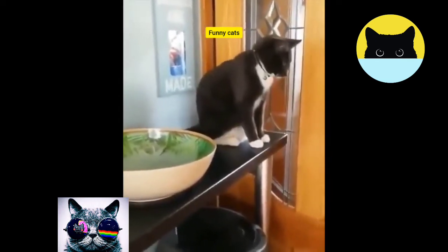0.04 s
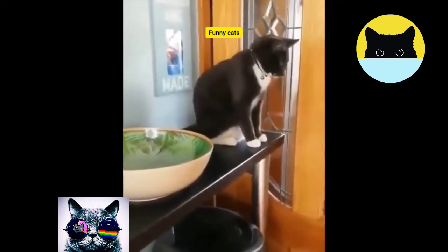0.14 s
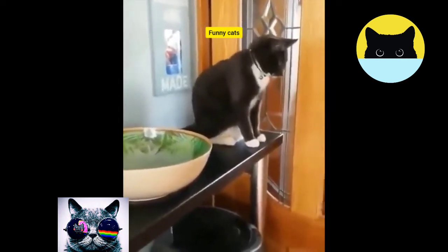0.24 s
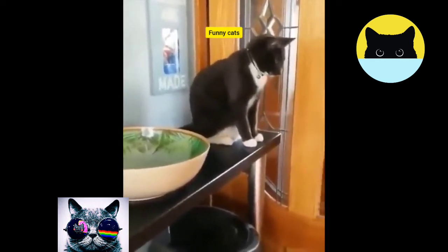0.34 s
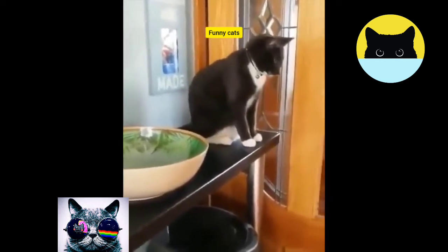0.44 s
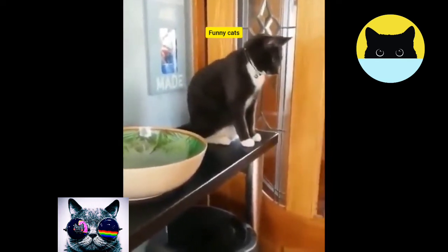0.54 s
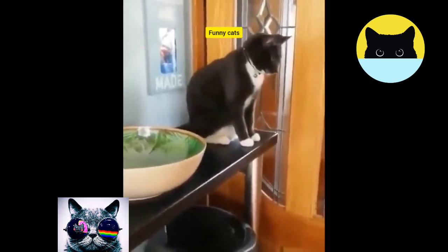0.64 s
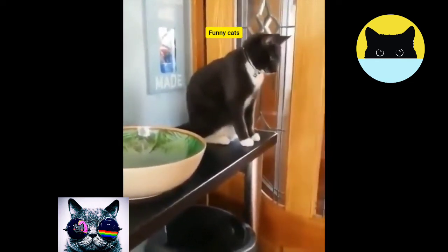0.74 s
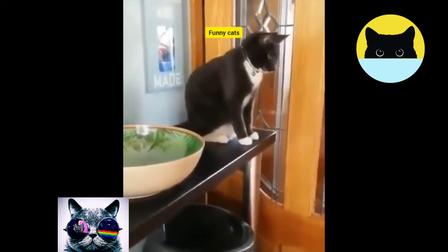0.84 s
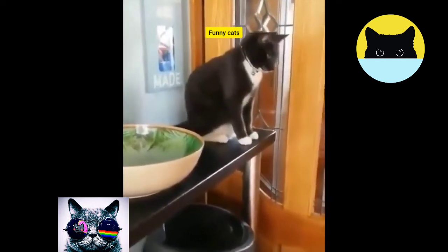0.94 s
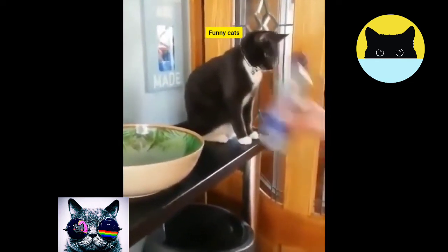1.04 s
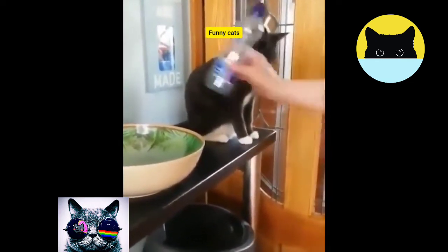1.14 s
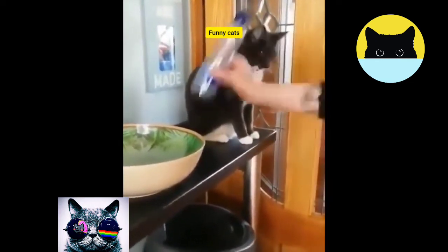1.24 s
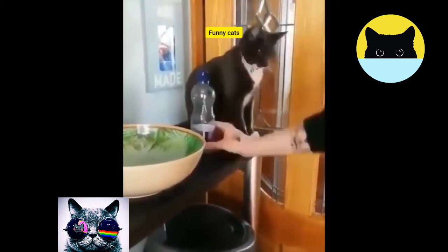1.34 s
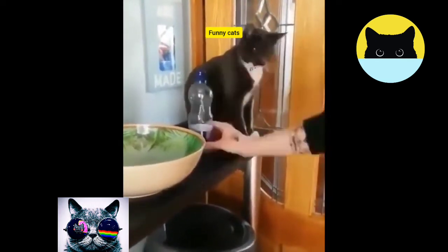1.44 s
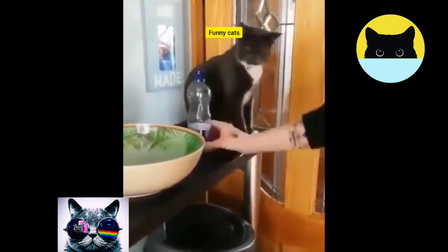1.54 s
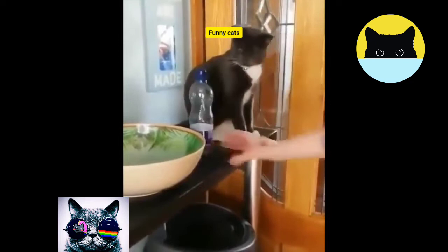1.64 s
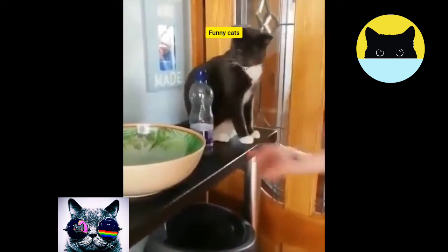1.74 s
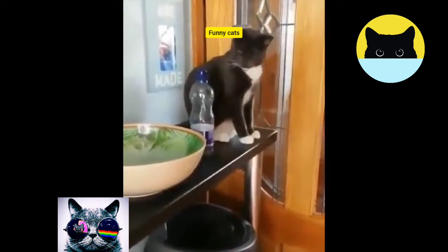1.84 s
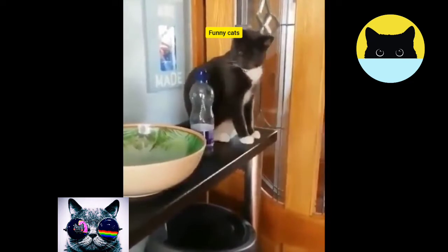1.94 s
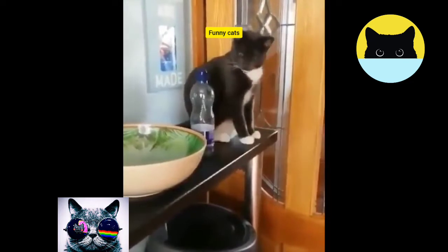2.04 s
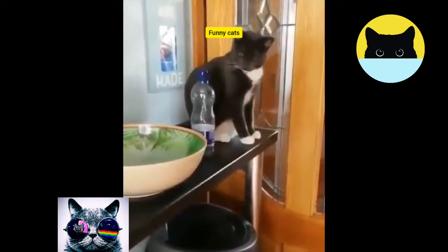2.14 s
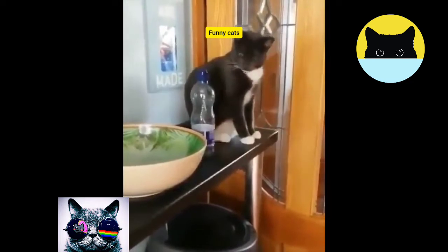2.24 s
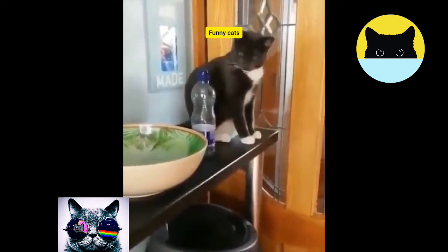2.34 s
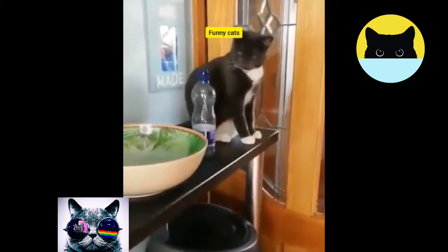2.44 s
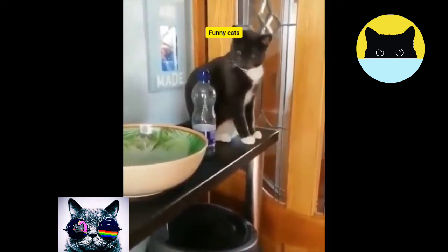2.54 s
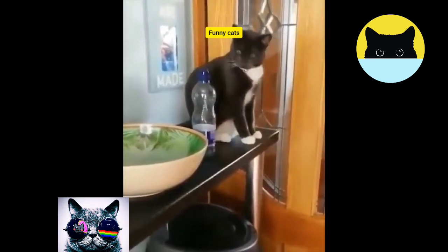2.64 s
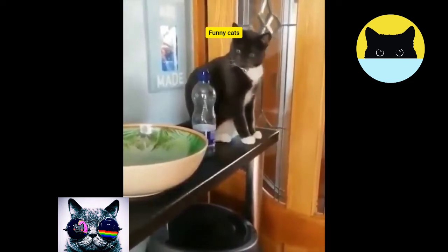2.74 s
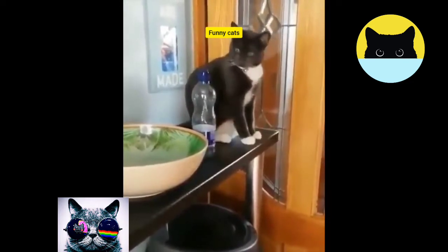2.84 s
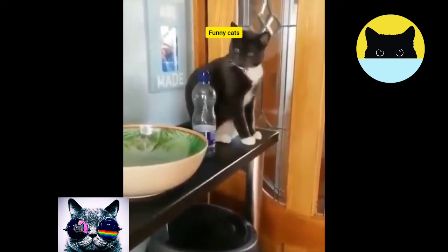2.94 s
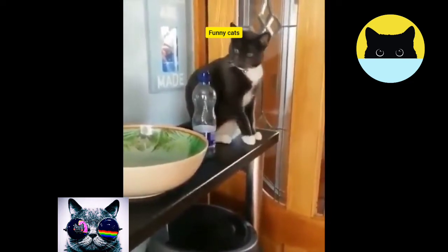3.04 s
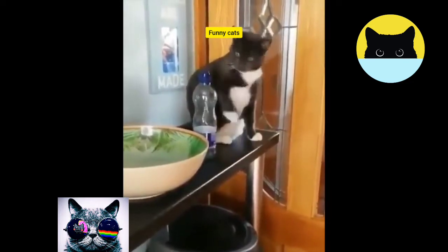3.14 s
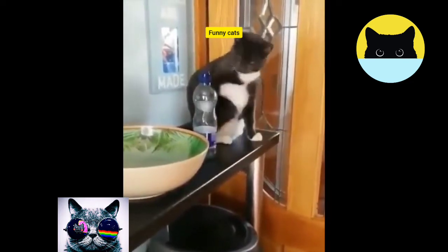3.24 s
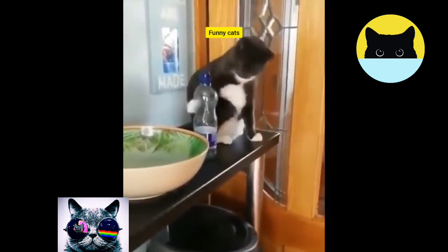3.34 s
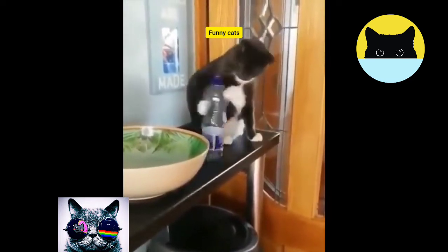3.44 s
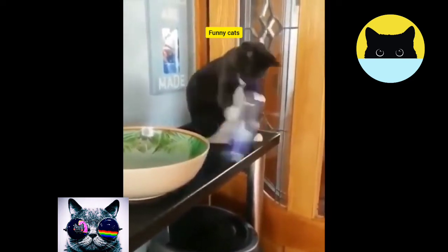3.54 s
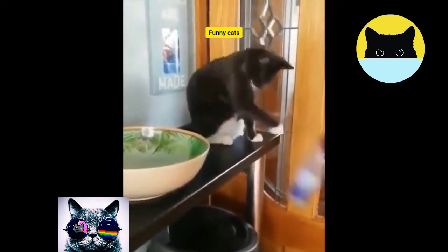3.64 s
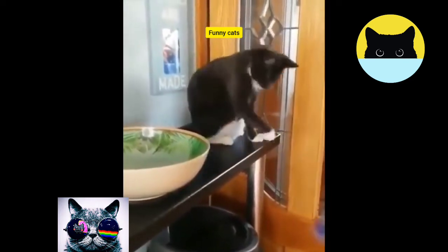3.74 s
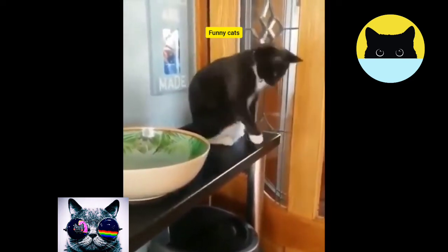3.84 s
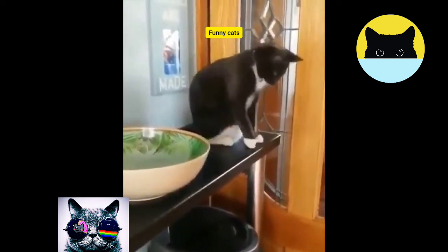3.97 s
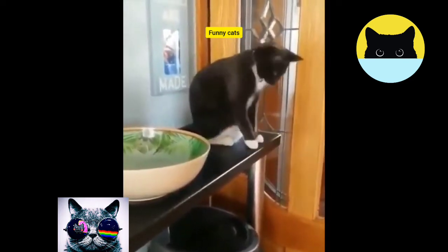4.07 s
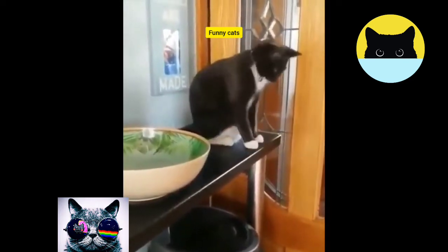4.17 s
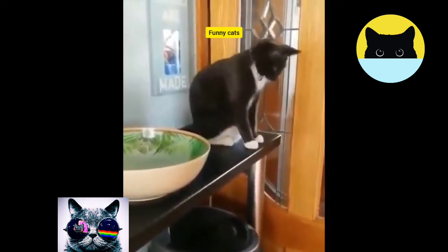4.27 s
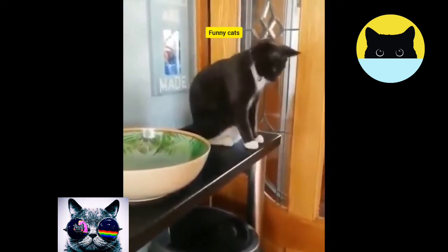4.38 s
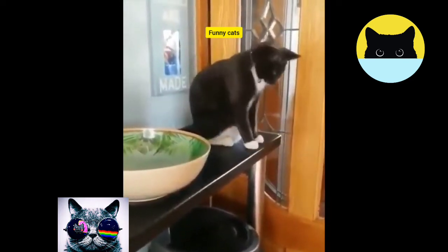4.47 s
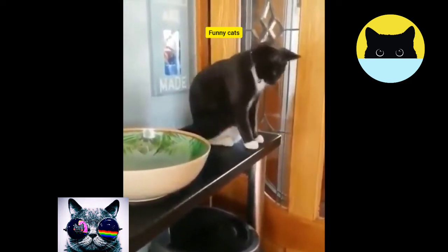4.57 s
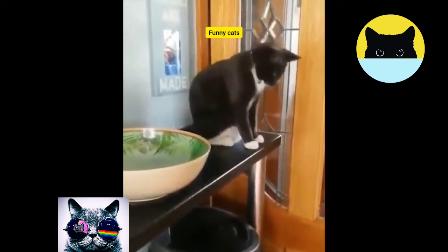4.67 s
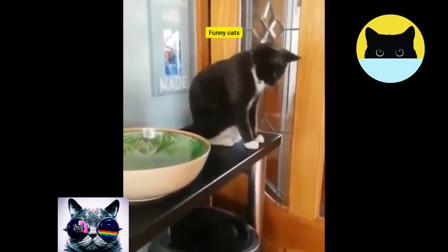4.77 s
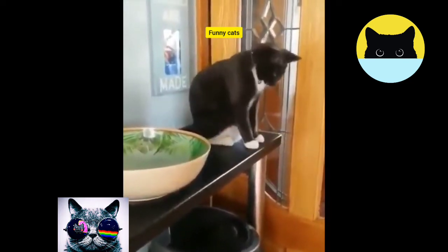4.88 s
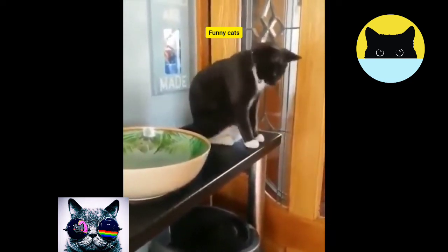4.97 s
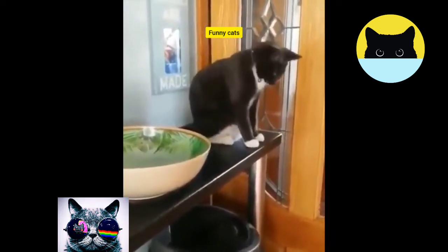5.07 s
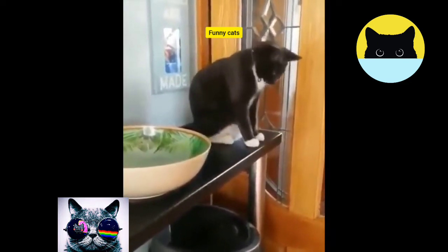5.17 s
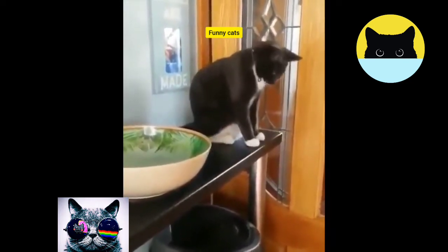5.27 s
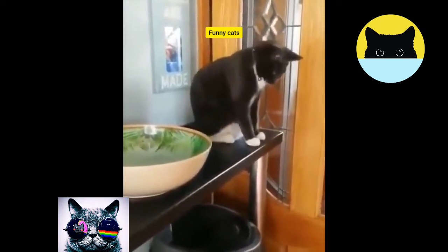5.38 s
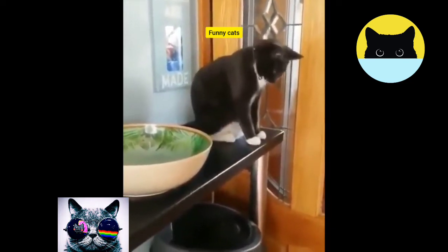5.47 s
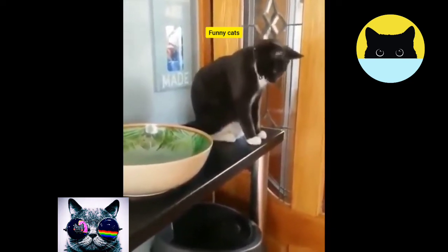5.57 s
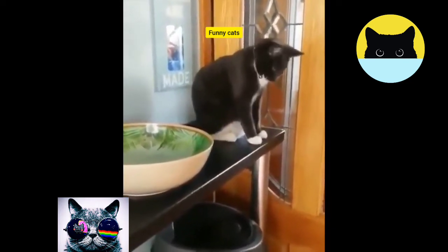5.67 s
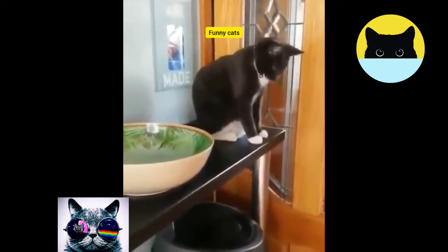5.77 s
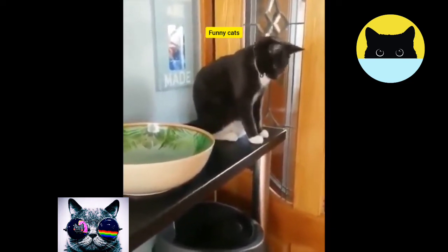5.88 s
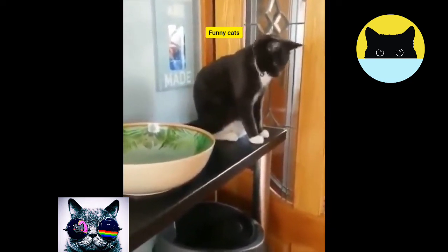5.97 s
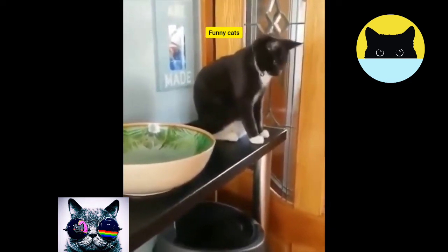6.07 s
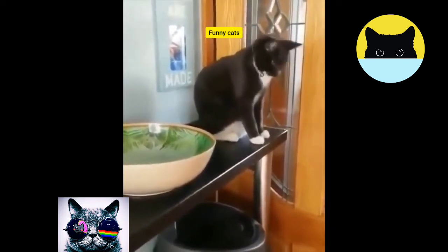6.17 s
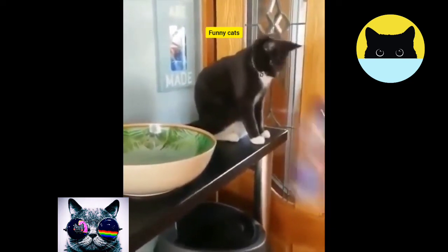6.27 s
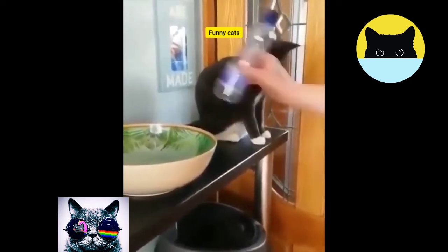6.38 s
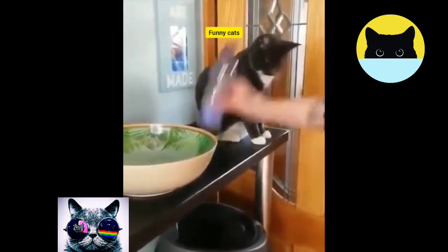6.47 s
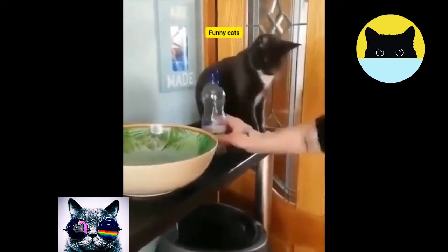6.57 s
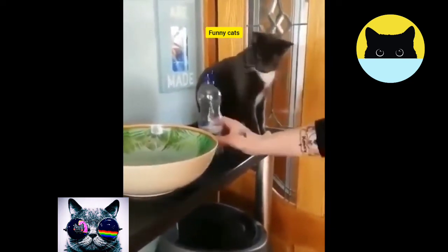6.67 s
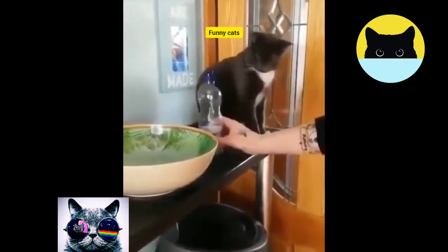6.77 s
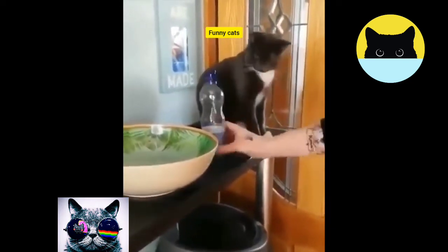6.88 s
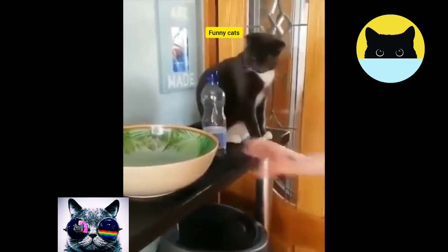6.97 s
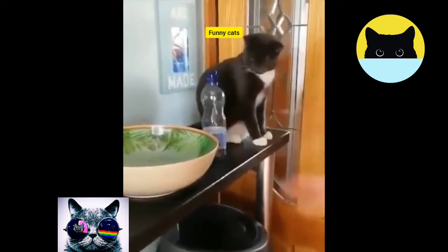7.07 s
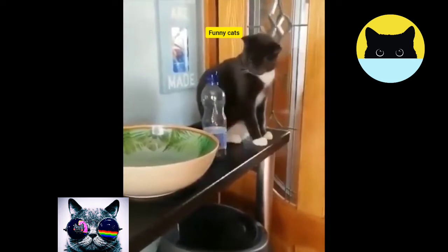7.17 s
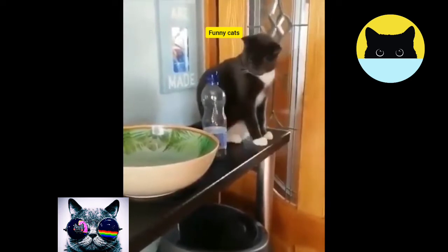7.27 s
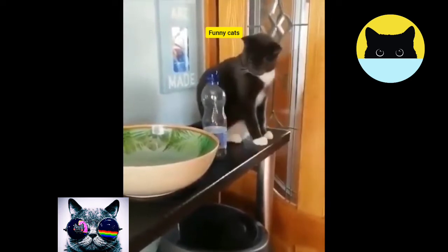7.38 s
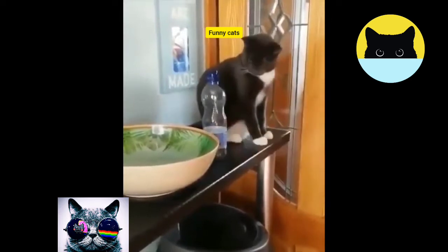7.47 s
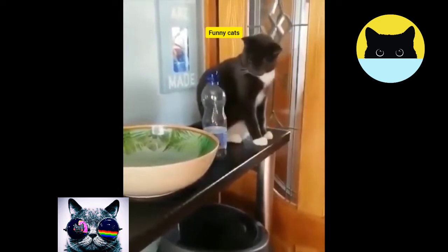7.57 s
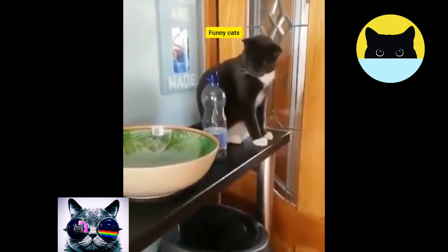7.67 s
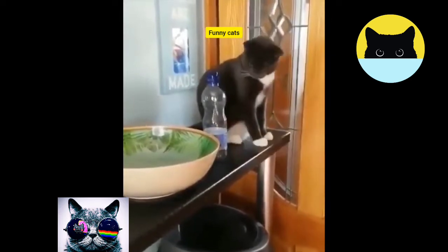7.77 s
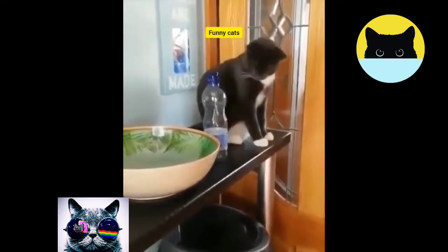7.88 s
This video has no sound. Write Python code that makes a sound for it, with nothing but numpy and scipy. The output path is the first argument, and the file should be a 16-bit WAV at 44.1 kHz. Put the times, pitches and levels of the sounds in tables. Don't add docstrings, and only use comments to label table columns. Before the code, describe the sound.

Sharp hollow plastic knocks in a small lively room: bottle set down, brushed off, clattering on the floor, crinkled and set down again with a pop.

```python
import sys
import numpy as np
from scipy import signal
from scipy.fft import rfft, irfft
from scipy.io import wavfile
from scipy.ndimage import uniform_filter1d

SR = 44100
rng = np.random.default_rng(int(sys.argv[2]) if len(sys.argv) > 2 else 0)


def generate_wav(sig):
    pcm = np.round(np.clip(np.atleast_2d(sig).T, -1, 1) * 32767).astype(np.int16)
    wavfile.write(sys.argv[1], SR, pcm)


def boost(x):
    u = np.asarray(x, float) / 20
    return 10 ** u


N = 349132

# start_s, blow_db, brightness_db, ring_db, room_db
SET_DOWN = [
    (1.2635, -14, 19.5, -1, 2),
    (1.2695, -20, -3, 2.5, -18),
    (1.274, -19, -14, -3, -22),
    (1.288, -19, 3, -8.5, -7),
    (1.311, -19, -3, -3.5, -23),
]
SET_BACK = [
    (6.586, -14, -26, -5.5, -3.5),
    (6.592, -29, -7, -18, -7.5),
    (6.598, -15.5, 17, -17.5, 4),
    (6.613, -13.5, 13.5, -27.5, 1.5),
]
BASE_BOUNCES = [
    (3.994, -12.5, -12.5, -25, 7),
    (4.004, -17, 5, -32, 2.5),
    (4.017, -19, 4, -3.5, -15),
    (4.034, -23.5, -3, -8, 7),
    (4.047, -25.5, 3, -6, -3),
]
SIDE_BOUNCES = [
    (4.208, -21.5, 0.0045, -6.5, 6.7),
    (4.215, -41, 0, 5, 3.9),
]
RIM_BOUNCES = [(4.4393, -29, 22, -5, 6.5), (4.443, -42, -8, -10, -6), (4.453, -35, 21, -29, -7),
               (4.525, -21, -6.5, -3.5, 3), (4.544, -35.5, -19, -12, 3), (4.47, -47, 6, 6, -10),
               (4.561, -36, 2, -12, -5), (4.632, -46, -3, 7, -7), (4.654, -42, 35, -9, 11.5),
               (4.684, -59, 25, 3, 8)]
CAP_BOUNCES = [
    (4.9185, -26, -1.5, -1.5, 6.5),
    (4.935, -41, 0, -14, 1),
]
LATE_BOUNCE = [
    (5.2945, -45, 0.29, -30, 11.7),
]
SQUEEZES = [
    (1.4606, -17, 2.5, -19, 1.5),
    (1.4654, -22.5, 14, -42, 0.72),
    (1.5044, -50, 0, -21, 1.2),
    (6.5283, -26.5, -9, -20, 3.4),
    (7.662, -68, 6, -11, 25),
]
WALL_POPS = [
    (3.2286, -47, -24, -21, 2.2),
    (3.3718, -63, -23, -17, 3.2),
    (6.233, -80, -1, -18, 2.3),
    (6.2723, -77, -1, -37, 3.2),
    (6.8538, -12.5, 7, -12, 2.6),
    (6.8744, -19, 28, -16.5, 6),
]
# pitch_hz, level_db (per Hz)
FIRST_COLOUR = [(35, -56), (60, -30), (268, -13), (312, -8.5), (386, 0), (619, -12.5), (1400, -7.5),
                (3580, -15), (5150, -29), (7250, -24), (10000, -42.5), (13000, -100.5), (22000, -120)]
SECOND_COLOUR = [(35, -68), (60, -14.5), (217, -7), (568, -14.5), (929, -7.5), (1200, -11), (2010, -8.5),
                 (2430, -0.5), (3080, -1.5), (6660, 0), (10000, -5.5), (13000, -21), (22000, -120)]
BOUNCE_COLOUR = [(120, -34.5), (200, -31), (327, -17), (404, -25), (639, -18), (1360, 2), (1710, -10.5),
                 (2400, -6), (4410, -9), (4710, -8.5), (7700, -6.5), (10000, -10), (13000, -27),
                 (22000, -120)]
SIDE_COLOUR = [(180, -49), (300, -22.5), (653, 4), (767, -12.5), (1080, -1), (2830, -13.5), (3140, -15.5),
               (7910, -9.5), (9290, -9), (10000, -55), (13000, -67), (22000, -120)]
RIM_COLOUR = [(210, -71), (350, -37), (613, -23), (871, -25), (1330, -10), (3490, -11.5), (4890, -13),
              (5870, -18), (8100, -15), (9590, -18), (10000, -43), (13000, -74), (22000, -120)]
CAP_COLOUR = [(410, -42), (700, -21), (1400, -12), (1650, 0.5), (2400, -1.5), (3930, -2), (4690, -12),
              (4870, -14), (5420, -7.5), (7490, -2.5), (10000, -1.5), (13000, -28), (22000, -120)]
SQUEEZE_COLOUR = [(590, -29.5), (1000, -17), (1600, -18.5), (2220, -13), (2750, -13), (2860, -21),
                  (3210, -8), (7940, -2.5), (10000, -8), (13000, -25), (22000, -120)]
POP_COLOUR = [(290, -52), (500, -43), (1060, -17.5), (1430, -8.5), (1960, -6.5), (2140, -5.5), (2890, -3),
              (3910, -4), (8930, -1.5), (10000, -9), (13000, -40), (22000, -120)]
# pitch_hz, width_hz, level_db
FIRST_WALL = [(1970, 210, -1.5), (2440, 400, -0.5), (3400, 600, 1), (4670, 550, 3), (3880, 500, 1.5),
              (5170, 330, -1.5), (5630, 200, 7.5), (6030, 340, 0), (8580, 360, -13.5)]
SECOND_WALL = [(1824, 320, -4.5), (2330, 120, -10), (2560, 160, 0), (2960, 320, -1.5), (3900, 150, 2),
               (2650, 150, -1.5), (4350, 190, 0.5), (6570, 200, 1), (7470, 180, 0), (1930, 250, 6),
               (3480, 270, -7.5), (6360, 340, -5), (9200, 610, -7), (9500, 600, 5)]
BASE_WALL = [(626, 146, 14.5), (1840, 530, 1), (2320, 680, 6), (2880, 350, 2), (3510, 300, 6),
             (3740, 200, 2), (4520, 150, -2), (4070, 240, 3.5), (4730, 300, 3), (5300, 400, -4.5),
             (5840, 600, 2), (6600, 400, -6)]
SIDE_WALL = [(1510, 220, 2.5), (1850, 260, 0), (2240, 260, 4), (3210, 180, -7), (3400, 320, 3.5),
             (3800, 220, -5), (4440, 260, -3), (2870, 250, 4), (4970, 430, 4.5), (5800, 770, -12),
             (770, 190, 4)]
RIM_WALL = [(1880, 240, -3.5), (2970, 300, 1.5), (4370, 300, 4), (5950, 350, -3), (2320, 420, 5),
            (3500, 420, 2), (4950, 300, 1.5), (5340, 460, -0.5), (6900, 350, 2.5), (7850, 380, 5)]
CAP_WALL = [(1990, 990, 5), (2630, 300, -0.5), (1900, 230, -2), (3970, 510, 2.5), (4380, 400, 6),
            (4900, 270, -11), (5820, 400, 3), (6650, 360, -16), (7550, 990, 3), (8740, 220, -16)]
LATE_WALL = [(2060, 230, -10), (2800, 450, -21), (3570, 500, 0), (4740, 880, 13), (8760, 410, -8)]
SQUEEZE_WALL = [(1620, 320, 10), (1880, 220, -13), (3700, 150, -9), (2600, 530, -3), (4500, 430, 4.5),
                (7350, 410, -3), (9040, 930, 3)]
POP_WALL = [(1810, 250, -2.5), (1450, 290, 1.5), (2820, 200, -2), (3770, 180, -11), (3900, 180, 4),
            (4600, 200, 1), (5540, 350, -5.5), (5760, 130, 3.5), (6300, 170, 0), (7030, 200, 0),
            (9070, 210, -3)]
SWEEP_WALL = [(930, 130, 20), (2910, 220, 8.5), (3440, 570, 4.5), (4080, 740, -5), (6400, 300, 2.5),
              (7800, 560, 6.5), (9200, 250, -8)]
GRASP_WALL = [(1820, 320, -16), (2430, 200, 6), (2840, 350, 9), (3520, 460, 7.5), (4570, 1450, 10),
              (5900, 300, 8.5), (6500, 500, 4), (7750, 760, 11), (8800, 800, -8)]
# pitch_hz, level_db, t60_s
FIRST_RING = [(219, 24, 0.093), (255, 17.5, 0.28), (385.6, 3.5, 0.61), (640, -22, 0.2), (933, 16, 0.12),
              (1364, 14, 0.14), (1620, 11.5, 0.17), (455, -6.5, 0.47)]
SECOND_RING = [(69.4, -3.5, 0.078), (843, 9, 0.11), (767, 17.5, 0.14), (952, 14.5, 0.18),
               (3410, -23.5, 0.042), (4500, -1, 0.054), (5770, -8, .03)]
BOUNCE_RING = [(545, -1.5, 0.81), (615, -17.5, 0.46), (1080, -4, 0.45), (1360, 6, 0.19), (1590, 8.5, 0.22),
               (2270, 10, 0.1), (2280, 1, 0.19), (2580, -1, 0.26), (2860, 0, 0.18), (3570, 4.5, .18),
               (4160, -12, 0.2), (4800, 9, .15), (635, 1, .12)]
SIDE_RING = [(518, -1, 0.31), (693, -4, 0.075), (628, -11, 0.87), (1100, 1, 0.21), (1472, -10, 0.074),
             (2200, -5, 0.11), (3570, -25, 0.3)]
RIM_RING = [(530, 7.5, 0.055), (616, 2, 0.058), (937, -7, 0.23), (1323, -1, 0.2), (2330, -9.5, 0.18),
            (2620, -15, 0.17), (3260, -11, 0.19), (3440, -11, 0.18), (4240, -11, 0.47), (4640, -16, .2)]
CAP_RING = [(1980, -13, 0.18), (1900, -7, 0.19), (2210, -2, 0.12), (2430, -8, 0.16), (3180, -8, .15),
            (3790, -4, 0.18), (4230, -5.5, 0.26), (8060, 7, 0.09), (7750, 15, 0.059)]
POP_RING = [(1880, -27, 0.022), (3620, -4, .02), (6260, -30, 0.0041), (7000, 13.5, 0.0095)]
# peak_s, level_db, swell_s, fade_s
SWEEP = [
    (3.465, -54.5, 0.033, 0.073),
    (3.493, -47, .02, .06),
    (3.512, -44, 0.034, 0.067),
    (3.555, -59, .02, 0.057),
    (3.62, -79, .03, .12),
    (3.232, -60.5, .004, 0.046),
]
GRASP = [
    (6.236, -55.5, 0.0078, 0.09),
    (6.278, -49, 0.018, 0.094),
    (6.315, -50.5, 0.023, 0.17),
    (6.36, -65, 0.033, 0.16),
]
# pitch_hz, level_db
SLIP_COLOUR = [(300, -54.5), (800, -13.5), (3000, -8.5), (8000, -19.5), (8800, -33), (9500, -31.5),
               (13000, -60.5), (22000, -120)]
# pitch_hz, t60_s
ROOM = [(150, 0.33), (500, 0.58), (1500, 0.47), (4000, 0.41), (9000, 0.37)]
# start_s, length_s, level_db, fading_db (change over the length, negative
GRIP = [(1.36, 0.45, -68, 13), (1.868, 0.36, -57, -12), (2.883, 0.14, -62, -13), (3.24, 0.16, -54.5, -10),
        (3.378, 0.58, -51.5, -13), (6.248, 0.12, -45, 3), (6.408, 0.17, -42, -5.5),
        (6.562, 0.077, -44.5, -2.5), (6.714, 0.1, -48.5, 3), (6.897, 0.094, -56, 11.5),
        (7.048, 0.19, -40, -3), (7.268, 0.28, -48, -3), (7.62, 0.23, -57.5, -5)]
# pitch_hz, level_db
GRIP_COLOUR = [(65, -49), (110, -45), (150, -9.5), (200, 6.5), (265, 3.5), (310, -19.5), (351, -7.5),
               (404, -24.5), (480, -22.5), (620, -37), (1060, -120)]
# start_s, level_db, pitch_hz
BUMPS = [(1.525, -44.5, 242), (1.651, -40, 237), (1.777, -99, 255), (1.874, -80, 199), (1.962, -42.5, 291),
         (2.032, -46.5, 234), (2.186, -43.5, 246), (3.397, -47, 193), (3.729, -45, 238), (7.415, -38, 200),
         (7.473, -39, 202), (7.61, -41, 243)]
# peak_s, level_db, swell_s, fade_s, brush_over_rub_db
RUSTLE = [(.616, -71.5, 0.018, 0.079, 5), (1.988, -51.5, 0.11, 0.13, -2.5), (2.45, -86.5, 0.83, 0.33, 17),
          (2.91, -58, 0.12, 0.2, -27), (3.231, -76.5, 0.006, 0.4, 11.5), (3.4, -69, .08, .1, 5),
          (3.512, -47, 0.034, 0.072, 5), (3.47, -61, 0.15, 0.074, 2), (3.58, -84, .05, 0.19, -2),
          (4.415, -61, 0.078, 0.13, 9), (4.656, -66.5, 0.024, 0.096, 16.5), (4.8, -71.5, 0.023, 1, 11),
          (5.14, -67.5, .1, .3, 3.5), (5.33, -60, 0.1, 0.085, 2.5), (5.648, -59, 0.11, 0.22, -7.5),
          (6.238, -82, 0.014, 0.11, 14), (6.283, -63.5, 0.016, 0.26, 7.5), (7.34, -60, 0.17, 0.74, -2),
          (7.685, -63, 0.042, 0.098, 8.5)]
# pitch_hz, level_db
RUB_COLOUR = [(240, -53.5), (400, -17), (780, -12.5), (928, -14), (1100, -10.5), (1610, -13), (2200, -17),
              (2860, -21.5), (4840, -120)]
BRUSH_COLOUR = [(1120, -72), (1900, -13), (2650, -7), (2860, -2.5), (3650, -5), (3970, -9), (7950, -6),
                (8600, -8.5), (9400, -6.5), (10000, -50), (13000, -61), (22000, -120)]
# pitch_hz, level_db (per Hz)
AIR = [(12, -46.5), (20, -49), (70, 1.5), (117, -18), (178, 2), (219, -3.5), (249, -1.5), (490, -12.5),
       (530, -18), (868, -9.5), (1460, -20.5), (1580, -17.5), (2050, -18.5), (8120, -29.5), (10000, -27),
       (13000, -58.5), (22000, -120)]
# pitch_hz, level_db
HUM = [(60, -98), (99, -78), (197, -73.5), (297, -77.5), (399, -81)]
BAND_EDGES = [0, 1550, 1800, 2050, 2400, 2750, 3100, 3450, 3800, 4150, 4500, 4850, 5200, 5550, 6200, 6550,
              6900, 7600, 8300, 8800, 9300, 9750, 23000]
STROKE_DB = 18


def evened(x):
    return x / np.sqrt(np.mean(x ** 2) + 1e-20)


def drift(length, *sizes):
    x = rng.standard_normal(length)
    for size in sizes:
        x = uniform_filter1d(x, size=size)
    return evened(x)


def read(points, hz):
    f, value = np.transpose(points)
    return np.interp(np.log(hz + 1), np.log(f + 1), value)


def add(mix, s, sound):
    part = mix[round(s * SR):][:len(sound)]
    part += sound[:len(part)]


def causal(gain_db):
    log_gain = np.log(boost(np.maximum(gain_db, -100)))
    circle = np.concatenate([log_gain, log_gain[-2:0:-1]])
    return np.fft.ifft(np.exp(np.conj(signal.hilbert(circle)))).real[:2048]


def noise(colour, patchy_db, size=1024):
    hz = np.fft.rfftfreq(size, 1 / SR)
    a, b, patches = rng.standard_normal((N * 4 // size + 5, len(hz), 3)).T
    patches = uniform_filter1d(patches, size=10, axis=0)
    patches = evened(uniform_filter1d(patches, size=12, axis=1))
    z = (a + 1j * b) * boost(read(colour, hz)[:, None] + patchy_db * patches)
    return evened(signal.istft(z, nperseg=size, noverlap=size * 3 // 4)[1][:N])


def bottle():
    direct, feed = (knocks(SET_DOWN, FIRST_COLOUR, FIRST_WALL, FIRST_RING, crack_s=0.001)
                    + knocks(SQUEEZES, SQUEEZE_COLOUR, SQUEEZE_WALL, POP_RING, crack_s=0.00023)
                    + knocks(WALL_POPS, POP_COLOUR, POP_WALL, POP_RING, crack_s=0.0012)
                    + knocks(BASE_BOUNCES, BOUNCE_COLOUR, BASE_WALL, BOUNCE_RING, crack_s=0.0015)
                    + knocks(SIDE_BOUNCES, SIDE_COLOUR, SIDE_WALL, SIDE_RING, crack_s=0.00052)
                    + knocks(RIM_BOUNCES, RIM_COLOUR, RIM_WALL, RIM_RING, crack_s=0.0034)
                    + knocks(CAP_BOUNCES, CAP_COLOUR, CAP_WALL, CAP_RING, crack_s=0.0029)
                    + knocks(LATE_BOUNCE, CAP_COLOUR, LATE_WALL, POP_RING, crack_s=0.0014)
                    + knocks(SET_BACK, SECOND_COLOUR, SECOND_WALL, SECOND_RING, crack_s=0.0071))
    rubbed = slips(SWEEP, SWEEP_WALL) + slips(GRASP, GRASP_WALL)
    return direct + rubbed + room(feed + boost(-3.0) * rubbed)


def knocks(rows, colour, wall, modes, crack_s):
    hz, lead_s = np.fft.rfftfreq(4096, 1 / SR), 0.007
    since = np.arange(SR // 2) / SR - lead_s
    treble = hz ** 2 / (hz ** 2 + 5040.0 ** 2)
    bass = 230.0 ** 2 / (hz ** 2 + 620.0 ** 2)
    tilt = treble - 0.13 * bass
    force = np.exp(np.minimum(since / 0.0012, -since / crack_s))[since < 0.014]
    head = (since > -0.001) & (since < 0.004)
    uneven_db = hollows(wall, hz) + 1 * drift(len(hz), 12, 6)
    out = np.zeros((2, N))
    for s, blow_db, bright_db, ring_db, room_db in rows:
        contact = rng.standard_normal(len(force)) * force
        click = causal(read(colour, hz) + uneven_db + bright_db * tilt)
        crack = signal.fftconvolve(contact, click)
        crack = crack / np.std(crack[head[:len(crack)]])
        ring = ringing(modes, since)
        rolled = ring * boost(2.5 * drift(len(since), 1200, 500)) * np.clip(since / 0.004, 0, 1)
        sound = boost(ring_db) * rolled / np.std(ring[head])
        spread = boost(-6.5) * sound
        add(spread, lead_s, click * np.linalg.norm(crack) / np.linalg.norm(click))
        add(sound, 0, crack)
        start_s = s + 0.001 - lead_s
        add(out[0], start_s, boost(blow_db - 11) * sound)
        add(out[1], start_s, boost(blow_db - 11 + room_db) * spread)
    return out


def hollows(wall, hz):
    return sum(db * 0.5 ** ((2 * (hz - f) / width) ** 2) for f, width, db in wall)


def ringing(modes, since):
    detune = rng.uniform(0.99, 1.01, len(modes))
    return sum(boost(db - 60 * since / t60) * twin(f * d, since)
               for (f, db, t60), d in zip(modes, detune))


def twin(hz, t):
    split, turn = rng.uniform([1.012, 0], [1.035, 1])
    return np.sin(2 * np.pi * hz * t) + 0.55 * np.sin(2 * np.pi * (hz * split * t + turn))


def slips(rows, wall):
    t, power = np.arange(N) / SR, np.zeros(N)
    for s, db, swell_s, fade_s in rows:
        away = np.maximum((s - t) / swell_s, (t - s) / fade_s)
        power += boost(db - STROKE_DB * away) ** 2
    happens = rng.random(N) < 2500 / SR
    size = boost(4 * np.minimum(rng.exponential(1, N), 4))
    clicks = size * rng.choice([-1., 1.], N) * happens
    hz = np.fft.rfftfreq(4096, 1 / SR)
    body = causal(read(SLIP_COLOUR, hz) + hollows(wall, hz))
    return np.sqrt(power) * evened(signal.oaconvolve(clicks, body)[:N])


def room(x):
    taps = np.zeros(SR)
    at = np.arange(130, SR - 12, 12)
    taps[at + rng.integers(0, 12, len(at))] = rng.choice([-1., 1.], len(at))
    hz, t, z = signal.stft(taps, SR, nperseg=256)
    tail = signal.istft(z * boost(-60 * t / read(ROOM, hz)[:, None]), SR, nperseg=256)[1]
    spectrum = rfft(tail)
    t60 = read(ROOM, np.arange(len(spectrum)) * SR / len(tail))
    broad = uniform_filter1d(abs(spectrum) ** 2, size=150)
    tail = irfft(spectrum / np.sqrt(broad / t60), len(tail))
    return signal.fftconvolve(x, tail / np.linalg.norm(tail))[:N]


def rustle():
    rub, brush = strokes()
    return rub * noise(RUB_COLOUR, patchy_db=1.2) + brush * noise(BRUSH_COLOUR, patchy_db=0.8, size=512)


def strokes():
    t, power = np.arange(N) / SR, np.zeros((2, N))
    for s, db, swell_s, fade_s, brush_db in RUSTLE:
        away = np.maximum((s - t) / swell_s, (t - s) / fade_s)
        power += boost(db - STROKE_DB * away + np.array([[0], [brush_db]])) ** 2
    return np.sqrt(power)


def grip():
    out = shifts() * noise(GRIP_COLOUR, patchy_db=2.5, size=2048)
    t = np.arange(2600) / SR
    for s, db, hz in BUMPS:
        swell = t / 0.016 * np.exp(1 - t / 0.0082)
        add(out, s, boost(db) * swell * np.sin(2 * np.pi * hz * t))
    return out


def shifts():
    grasp_s, let_go_s, edge_db = 0.011, 0.028, 9.5
    t, power = np.arange(N) / SR, np.zeros(N)
    for s, length, db, fading_db in GRIP:
        edge = np.maximum(np.maximum((s - t) / grasp_s, (t - s - length) / let_go_s), 0)
        fading = fading_db * np.clip((t - s) / length, 0, 1)
        power += boost(db + fading - edge_db * edge) ** 2
    return np.sqrt(power)


def appliances():
    air_db, warm_db, settle_s = -60, 2.5, 0.67
    t = np.arange(N) / SR
    waver = np.cumsum(1 + 0.0133 * drift(N, 9000)) / SR
    hum = sum(boost(db) * np.sqrt(2) * np.sin(2 * np.pi * (hz * waver + rng.random())) for hz, db in HUM)
    level_db = air_db + warm_db * np.exp(-(t / settle_s) ** 2)
    return hum + boost(level_db) * noise(AIR, patchy_db=3.0, size=2048)


def scene():
    return (bottle() + rustle() + grip() + appliances())[None]


def decibels(power):
    return 10 * np.log10(abs(power) + 1e-14)


def thin_out(x, margin_db, loud_db, quiet_db, chance_db, debt_db, top_db, weak_db):
    hz, t, z = signal.stft(x, SR, nperseg=1024, noverlap=768)
    band = np.searchsorted(BAND_EDGES, hz, side="right") - 1
    member = (band == np.arange(len(BAND_EDGES) - 1)[:, None]) * 1.
    power = uniform_filter1d(member @ abs(z) ** 2 / member.sum(1)[:, None], size=5, axis=1)
    band_db = decibels(power)
    near_db = decibels(uniform_filter1d(power[1:], size=7, axis=0, mode="nearest"))
    overall_db = near_db.mean(0)
    low_edge = np.array(BAND_EDGES[1:-1])
    high = top_db * np.clip((low_edge - 7600) / 700, 0, 2)[:, None]
    mask_db = np.maximum(near_db - margin_db, band_db[0] - loud_db) + high / 4
    mask_db = np.maximum(mask_db, quiet_db + high)
    whim = evened(uniform_filter1d(rng.standard_normal(mask_db.shape), size=20, axis=1))
    loud = overall_db - np.percentile(overall_db, 20)
    debt = np.clip(signal.lfilter([0.04], [1, -0.96], loud) / 12, 0, 1)
    mask_db = mask_db + debt_db * debt + 1.5 * (1 - debt) * (low_edge == 1800)[:, None]
    under_db = mask_db - band_db[1:] + chance_db * (1 - 0.7 * debt) * whim
    kept = 1 / (1 + np.exp(np.clip(under_db, -30, 30)))
    top_kept = np.minimum.accumulate(np.where(high > 0, kept, 1), axis=0)
    kept = np.where(high > 0, top_kept, kept)
    kept = np.vstack([np.ones(len(t)), kept])
    line_db = decibels(uniform_filter1d(abs(z) ** 2, size=5, axis=1))
    weak = np.clip(band_db[band] - weak_db - line_db, -30, 30)
    kept = kept[band] * np.where(band[:, None] > 0, 1 / (1 + np.exp(weak)), 1)
    jump_db = overall_db - np.roll(overall_db, 5)
    attack = np.clip((jump_db - 8) / 4, 0, 1)
    return signal.istft(z * np.maximum(kept, attack), SR, nperseg=1024, noverlap=768)[1][:N]


def band_limit(x):
    return signal.sosfilt(signal.butter(12, 10690, fs=SR, output="sos"), x)


def record(dry):
    lowpass = signal.firwin(401, 9750, window=("kaiser", 9), fs=SR)
    limited = signal.oaconvolve(dry[0], lowpass, "same")
    thinned = thin_out(limited, margin_db=8.5, loud_db=38, quiet_db=-108, chance_db=3, debt_db=5,
                       top_db=7, weak_db=1.5)
    return band_limit(thinned[None])


dry = scene()
out = record(dry)
generate_wav(out)
```